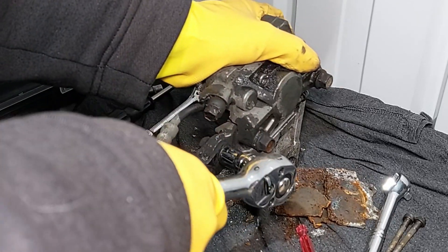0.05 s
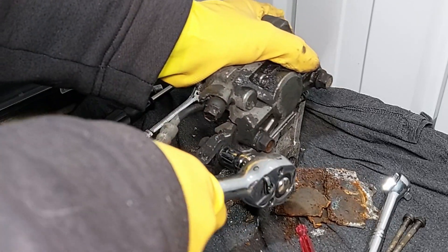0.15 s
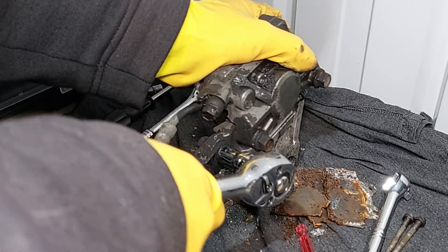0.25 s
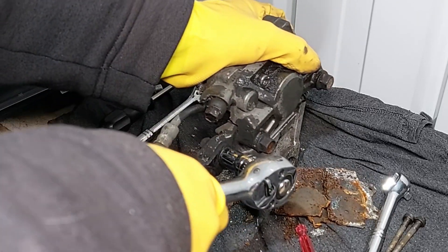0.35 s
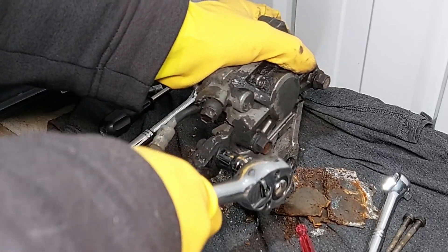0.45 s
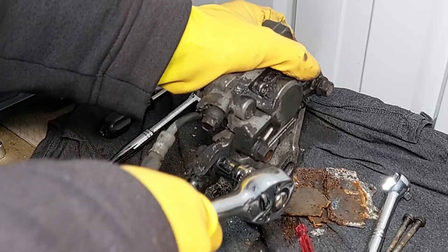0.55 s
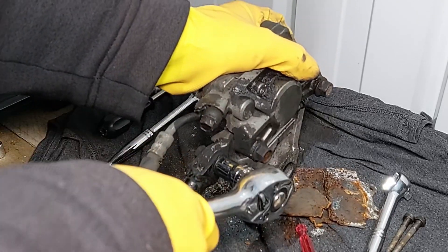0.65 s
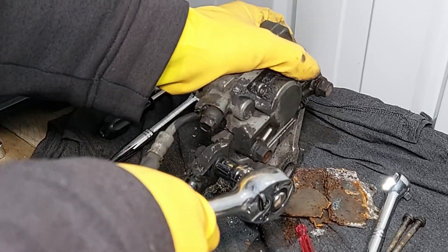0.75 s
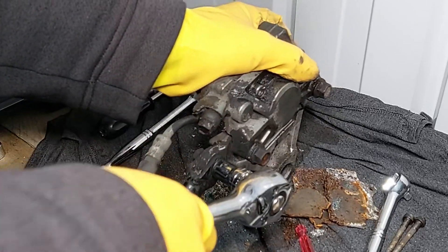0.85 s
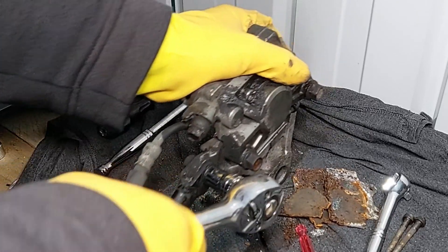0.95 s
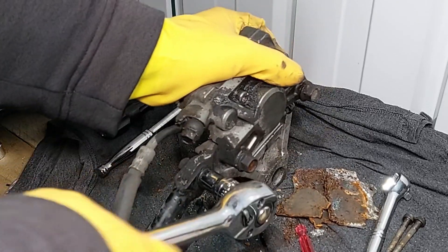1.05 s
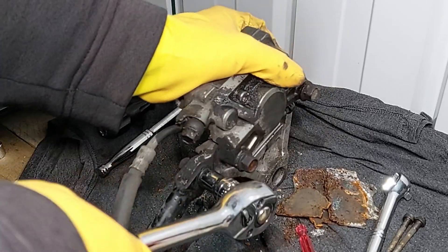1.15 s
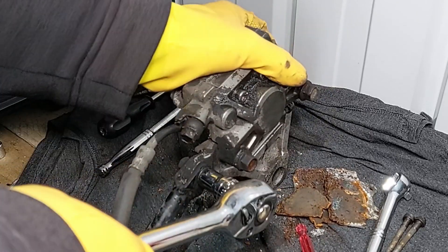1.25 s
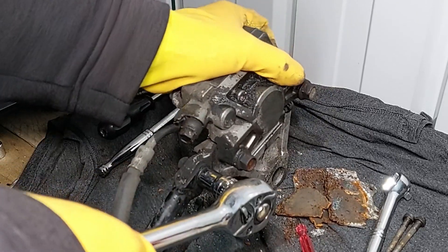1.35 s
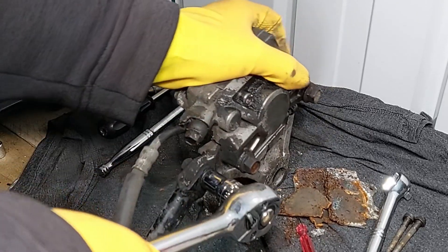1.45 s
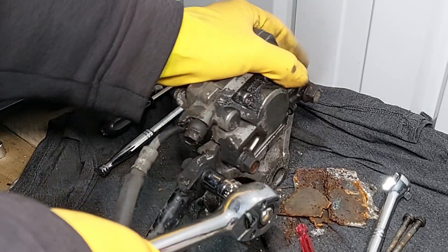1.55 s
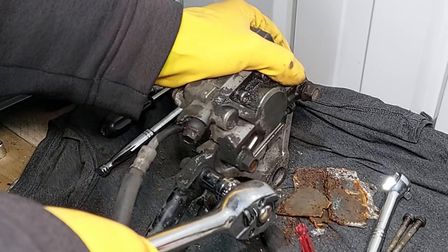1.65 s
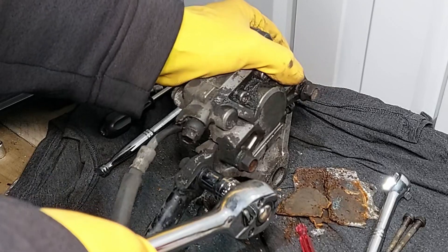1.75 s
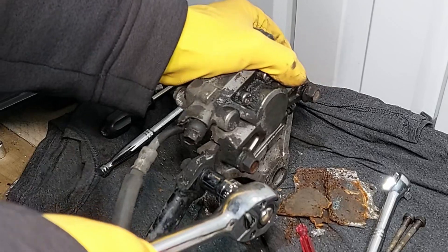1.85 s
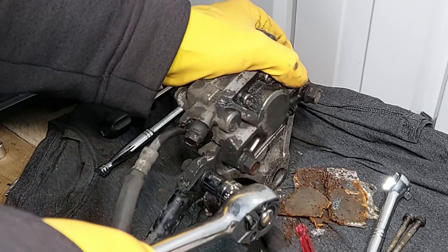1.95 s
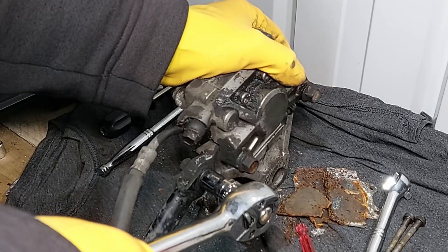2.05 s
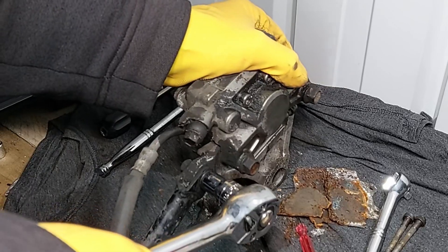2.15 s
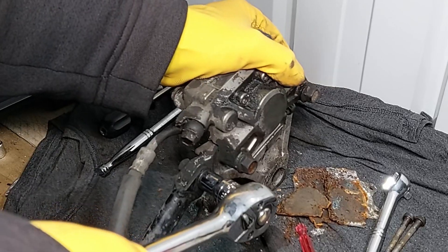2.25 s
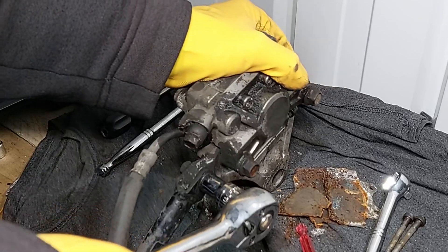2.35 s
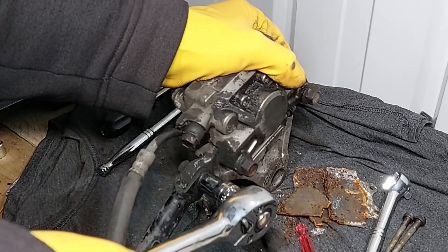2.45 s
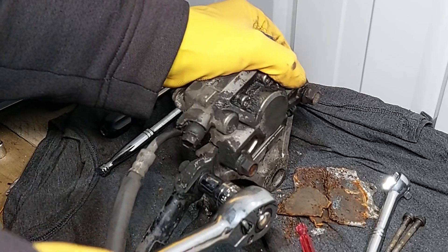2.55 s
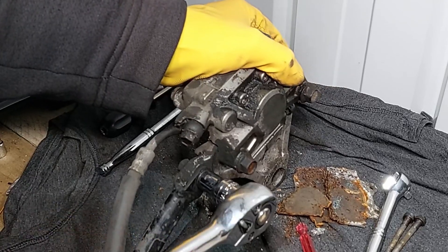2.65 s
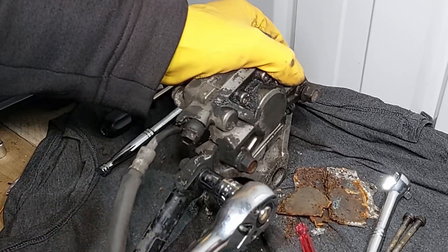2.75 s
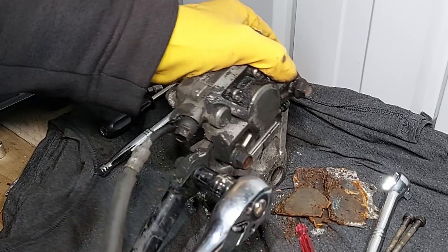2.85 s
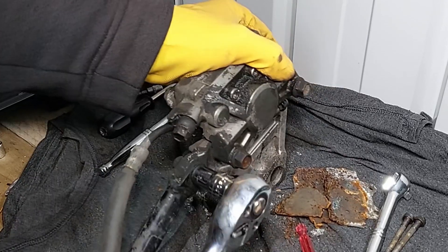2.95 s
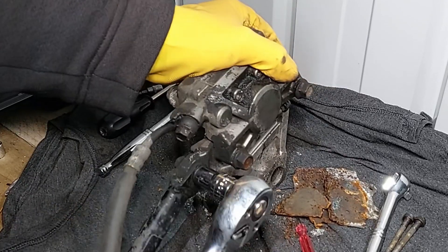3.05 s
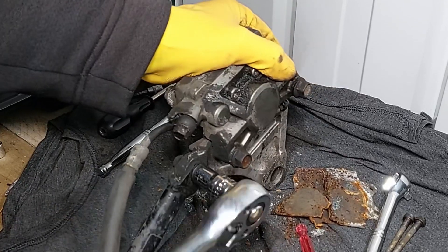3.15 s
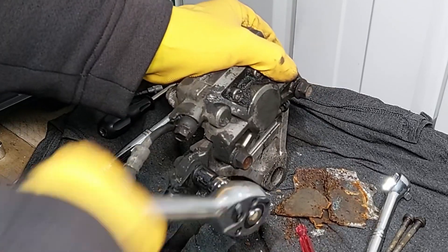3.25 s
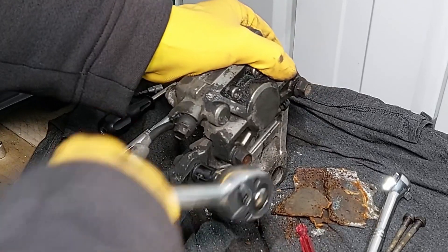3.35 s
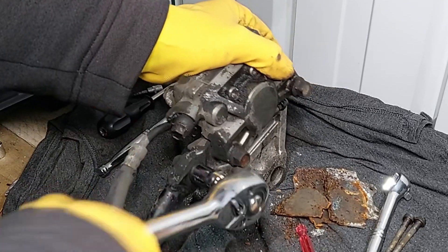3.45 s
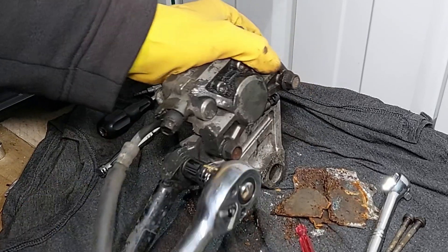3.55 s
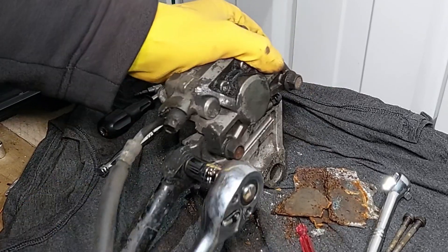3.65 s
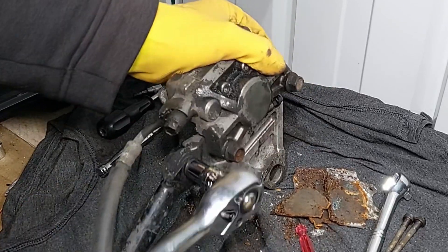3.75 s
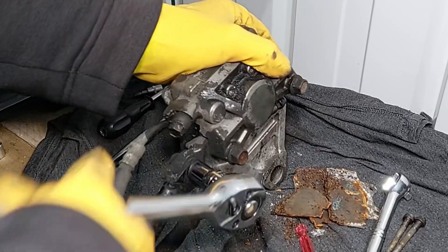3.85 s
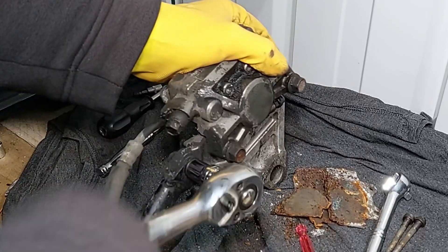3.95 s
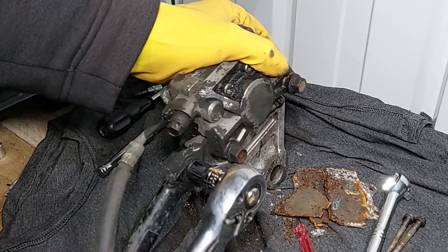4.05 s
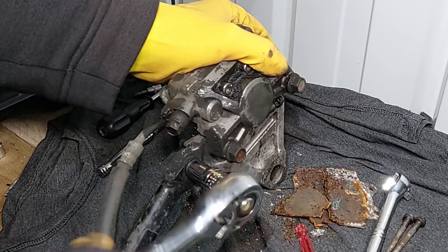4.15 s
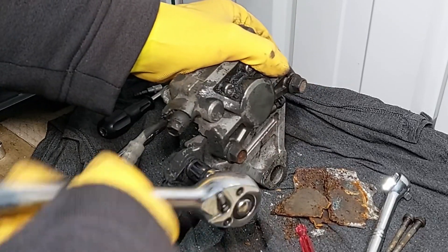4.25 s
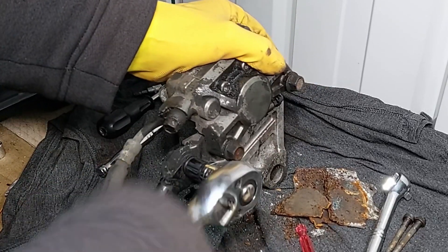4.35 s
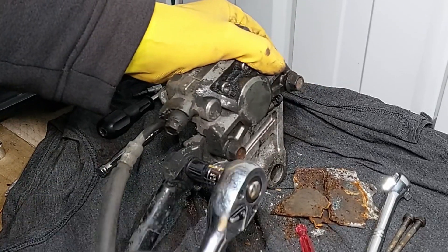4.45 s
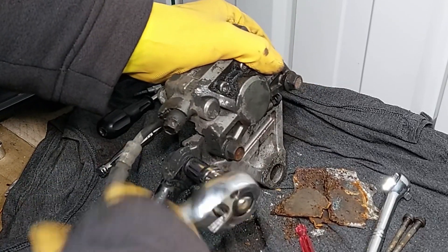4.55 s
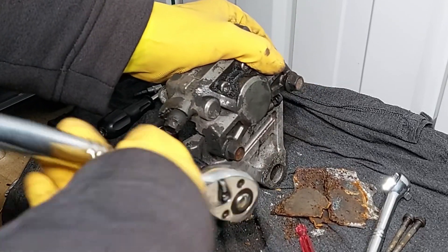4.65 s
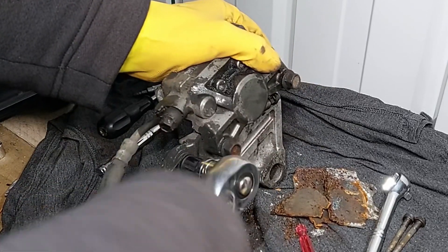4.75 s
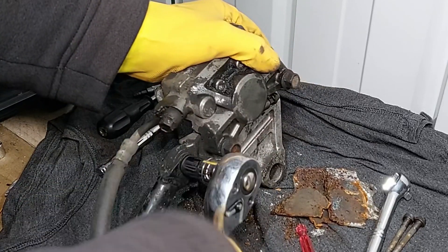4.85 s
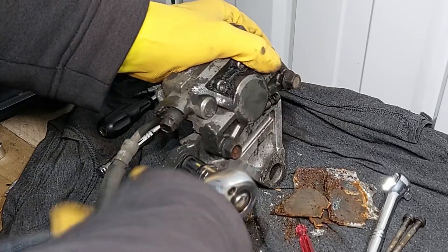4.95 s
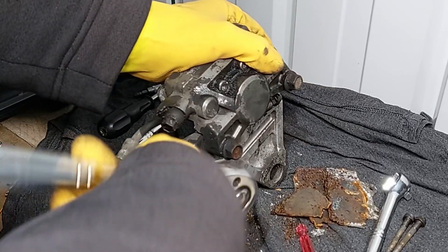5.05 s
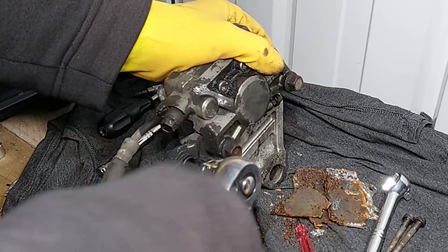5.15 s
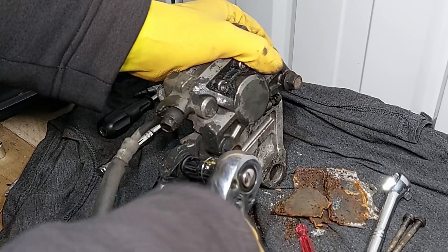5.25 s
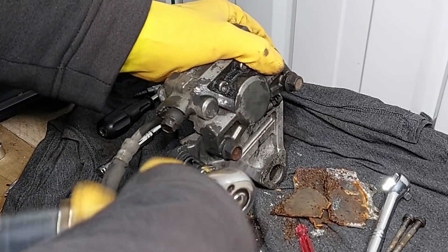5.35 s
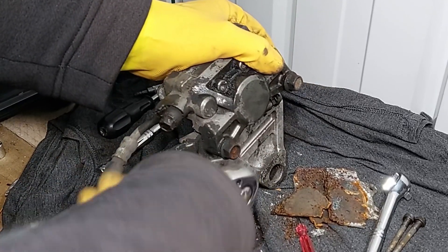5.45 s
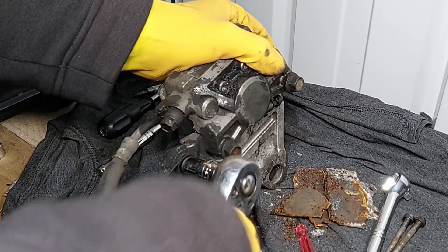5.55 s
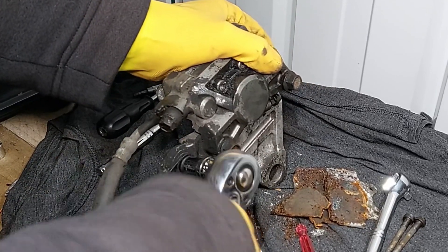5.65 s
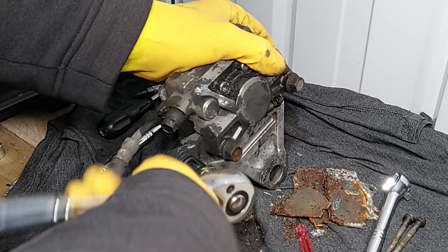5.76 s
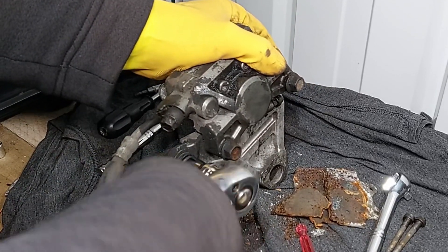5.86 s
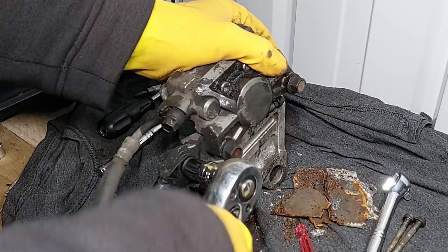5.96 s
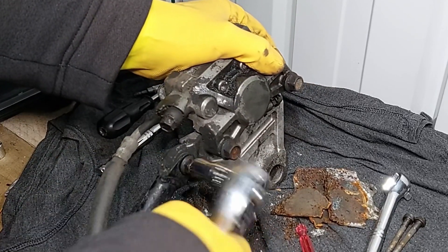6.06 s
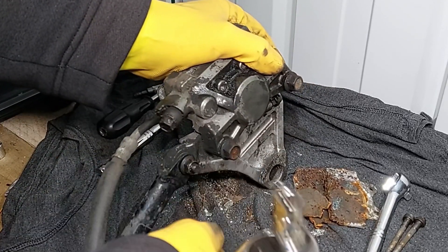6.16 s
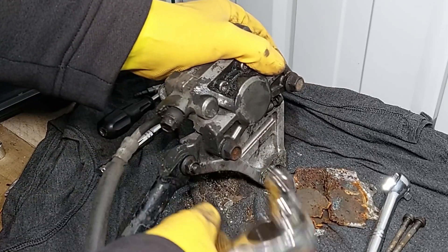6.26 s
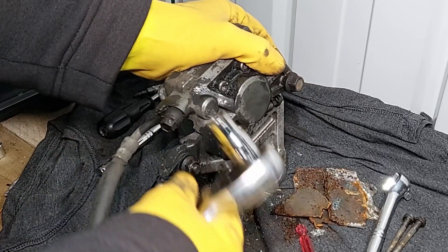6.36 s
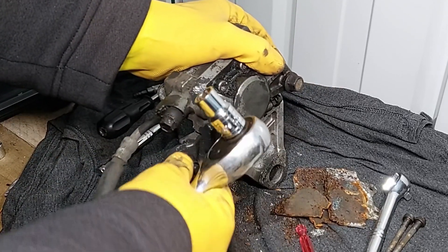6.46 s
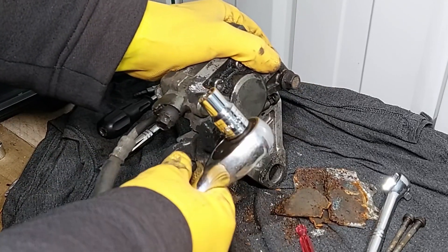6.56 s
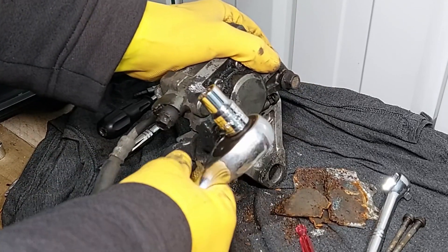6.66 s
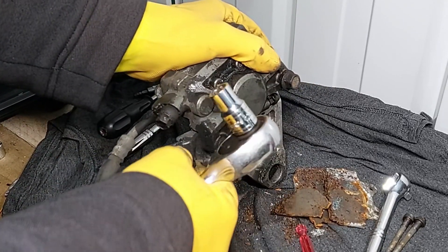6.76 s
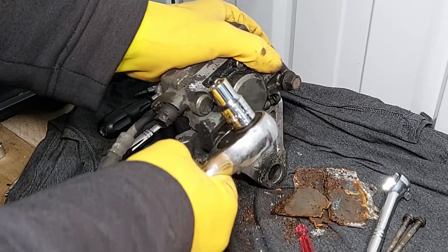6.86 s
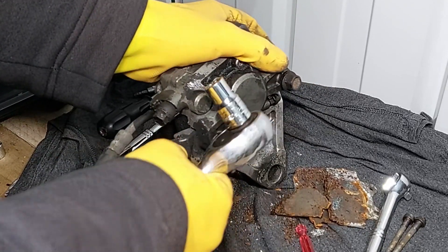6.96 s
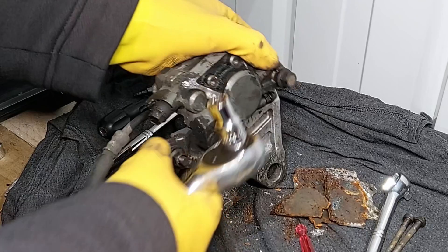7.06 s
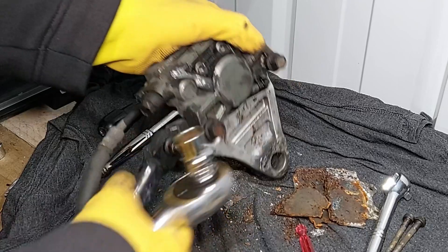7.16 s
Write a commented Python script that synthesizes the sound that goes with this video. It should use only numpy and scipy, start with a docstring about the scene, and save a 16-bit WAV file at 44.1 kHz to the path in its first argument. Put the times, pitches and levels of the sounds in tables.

```python
"""In a small shed, a hand ratchet is swung back seven times on a bolt; its sprung pawl snaps over the gear teeth
and bounces. Each blow is a burst of crack noise with decaying handle and head modes. The casting knocks on a
cloth-covered bench as sine thumps, small parts tap as humped noise bursts, gloves and sleeves rustle as grainy
noise, and the load rumbles, scrapes and squeaks faintly. Two close microphone ports hear it a little from one side."""
import sys
import numpy as np
from scipy import signal
from scipy.fft import rfft, irfft
from scipy.io import wavfile
from scipy.ndimage import uniform_filter1d

SR = 44100
rng = np.random.default_rng(int(sys.argv[2]) if len(sys.argv) > 2 else 0)


def wav_record(signal):
    """Record a signal, one row per channel, as 16-bit PCM in the file named by sys.argv[1]."""
    frames = np.transpose(np.atleast_2d(signal))
    bounded = np.clip(frames, -1, 1)
    # unit amplitude maps onto the largest positive 16-bit level
    quanta = np.round(bounded * 32767).astype(np.int16)
    wavfile.write(sys.argv[1], SR, quanta)


N = 317961  # samples

# Back swings of the handle. Each row: start in seconds, end in seconds, level of the first handle mode under
# each blow in dB, rumble level in dB, scrape level in dB, sleeve level in dB.
SWINGS = [(3.214, 3.40, -30.5, -49, -41.5, -53.5), (3.817, 3.97, -40.5, -48, -36, -45),
          (4.24, 4.36, -38.5, -37, -41, -47.5), (4.595, 4.74, -42, -38.5, -41.5, -48),
          (4.998, 5.13, -52, -42.5, -41, -50), (5.39, 5.49, -39.5, -52, -44.5, -46),
          (5.748, 5.87, -40, -44.5, -36, -45)]


def gain_of(db):
    """Decibels to amplitude."""
    return 10 ** (np.asarray(db) / 20)


def evened(x):
    """Scales to rms 1."""
    return x / np.sqrt(np.mean(x ** 2) + 1e-20)


def read(points, hz):
    """Reads a spectrum table along a log-frequency axis."""
    f, value = np.transpose(points)
    return np.interp(np.log(hz + 1), np.log(f + 1), value)


def add(mix, s, sound):
    """Mixes a sound in at time s, in seconds."""
    part = mix[round(s * SR):][:len(sound)]
    part += sound[:len(part)]


def coloured(x, spectrum):
    """Filters x by a dB spectrum."""
    hz = np.fft.rfftfreq(len(x), 1 / SR)
    return irfft(rfft(x) * gain_of(read(spectrum, hz)), len(x))


def ring(t, hz, db, t60, rise=0.00062):
    """A struck mode: a sine that swells within the rise time and loses 60 dB in t60 seconds."""
    decay = gain_of(db - 60 * t / np.maximum(t60, .005))
    return decay * (1 - np.exp(-t / rise)) * np.sin(2 * np.pi * hz * t)


def grainy(per_s, spread_db, smooth, grain_s):
    """Noise made of short slips of uneven size over a smooth bed."""
    slips = rng.random(N) < per_s / SR
    size = gain_of(spread_db * np.minimum(rng.exponential(1, N), 5)) * slips
    shape = np.exp(-np.arange(2000) / (grain_s * SR))
    grains = evened(signal.oaconvolve(size, shape)[:N])
    return rng.standard_normal(N) * (smooth + grains)


def swung(column, rise_db_per_s, fall_db_per_s):
    """An amplitude that climbs into each swing, holds its level and sinks after it."""
    t = np.arange(N) / SR
    total = np.zeros(N)
    for row in SWINGS:
        climb_db = rise_db_per_s * np.maximum(row[0] - t, 0)
        sink_db = fall_db_per_s * np.maximum(t - row[1], 0)
        total += gain_of(row[column] - climb_db - sink_db)
    return total


def air():
    """The steady air of the shed: noise, heaviest in the bass."""
    # Colour of the air. Each row: frequency in Hz, relative density in dB per Hz.
    air_spectrum = [(12, -37), (20, 9), (65, 9.5), (205, -20.5), (295, -3.5), (414, -14.5), (450, -21.5),
                    (518, -22), (1780, -28.5), (2350, -37.5), (10400, -31.5), (14200, -37), (16300, -54)]
    level_db = -48
    return gain_of(level_db) * evened(coloured(rng.standard_normal(N), air_spectrum))


def shed(x):
    """Dense reflections, each band dying at its own speed."""
    # Decay of the room. Each row: frequency in Hz, t60 in seconds.
    decay_times = [(200, 0.18), (1000, 0.24), (4000, 0.17), (9000, 0.12), (15000, 0.17)]
    hz, t, z = signal.stft(rng.standard_normal(SR // 2), SR, nperseg=256)
    fade = gain_of(-60 * t / read(decay_times, hz)[:, None])
    tail = signal.istft(z * fade, SR, nperseg=256)[1]
    tail *= np.minimum(np.arange(len(tail)) / (0.0062 * SR), 1)  # the reflections build up over 6.2 ms
    return signal.fftconvolve(x, tail / np.linalg.norm(tail))[:N]


def bench_load():
    """The casting rocks and drags: lumpy rumble and a low scrape."""
    # Weight shifting on the bench apart from the swings. Each row: time in seconds, rumble level in dB,
    # scrape level in dB.
    load_levels = [(0, -54, -48.5), (.3, -49, -53.5), (.61, -63, -44), (.8, -56, -48.5), (.95, -44, -43.5),
                   (1.14, -50.5, -46.5), (1.45, -45, -52.5), (1.84, -53, -51.5), (2.05, -50, -54.5),
                   (2.4, -49, -50), (2.77, -47.5, -59), (3.0, -50, -42.5), (3.13, -60, -36),
                   (3.38, -47, -39), (3.47, -23.5, -47), (3.58, -39, -40.5), (3.68, -33.5, -29),
                   (4.05, -38.5, -49), (4.18, -46, -59), (4.901, -44, -55.5), (6.051, -43.5, -61),
                   (6.158, -45.5, -31.5), (6.27, -51, -55), (6.45, -58.5, -53.5), (6.7, -48, -43),
                   (6.88, -54.5, -58), (7.08, -47, -52.5), (7.21, -60, -50)]
    # Colour of the rocking. Each row: frequency in Hz, relative density in dB per Hz.
    rumble_spectrum = [(12, -37.5), (20, -6), (86, 1.5), (162, -1), (193, -6), (260, -3.5), (340, -28),
                       (570, -120)]
    # Colour of the dragging. Each row: frequency in Hz, relative density in dB per Hz.
    scrape_spectrum = [(82, -36), (140, -4.5), (275, 0), (344, -0.5), (431, 5), (506, -1), (681, -5.5),
                       (779, -11.5), (1020, -9), (1200, -10), (1560, -56.5), (2640, -120)]
    s, rumble_db, scrape_db = np.transpose(load_levels)
    t = np.arange(N) / SR
    push = swung(column=3, rise_db_per_s=110.5, fall_db_per_s=75)
    drag = swung(column=4, rise_db_per_s=110.5, fall_db_per_s=75)
    rumble = evened(coloured(grainy(40, spread_db=2.5, smooth=1.1, grain_s=.02), rumble_spectrum))
    scrape = evened(coloured(grainy(120, spread_db=3., smooth=.7, grain_s=.007), scrape_spectrum))
    rumble_gain = gain_of(np.interp(t, s, rumble_db)) + push
    scrape_gain = gain_of(np.interp(t, s, scrape_db)) + drag
    return rumble_gain * rumble + scrape_gain * scrape


def rustle():
    """Fine fibre slips; the treble has its own level; the sleeve drags through each swing and settles."""
    # Cloth and gloves rubbing. Each row: time in seconds, body level in dB, treble level in dB.
    rub_levels = [(0, -60.5, -65.5), (.48, -60.5, -67), (.55, -53, -61), (.75, -60, -61.5),
                  (.95, -47, -54.5), (1.14, -54.5, -62), (1.35, -47, -59.5), (1.75, -51, -69),
                  (1.9, -57.5, -66), (2.55, -61.5, -68), (2.68, -49.5, -66), (2.73, -41, -59),
                  (2.85, -43, -58), (2.97, -45, -56), (3.15, -45, -57.5), (3.58, -45, -55.5),
                  (3.72, -37.5, -51.5), (4.15, -77.5, -63.5), (5.1, -58, -68), (6.1, -58, -67),
                  (6.16, -46, -56.5), (6.34, -59.5, -68), (6.52, -62.5, -63), (6.57, -47, -69),
                  (6.85, -64.5, -66), (6.9, -54, -64.5), (7.21, -56.5, -66)]
    # Colour of the cloth. Each row: frequency in Hz, relative density in dB per Hz.
    cloth_spectrum = [(180, -38), (300, -1), (331, -2), (398, -4), (462, -4.5), (537, -4.5), (946, -10),
                      (2070, -7.5), (6520, -13.5), (16000, -24)]
    sleeve_treble_db = -7  # against the sleeve's body
    s, body_db, treble_db = np.transpose(rub_levels)
    t = np.arange(N) / SR
    sleeve = swung(column=5, rise_db_per_s=210, fall_db_per_s=81)
    cloth = coloured(grainy(900, spread_db=3.5, smooth=1.1, grain_s=.003), cloth_spectrum)
    body = signal.sosfiltfilt(signal.butter(1, 4000, fs=SR, output="sos"), cloth)
    fizz = cloth - body
    body_gain = gain_of(np.interp(t, s, body_db)) + sleeve
    fizz_gain = gain_of(np.interp(t, s, treble_db)) + gain_of(sleeve_treble_db) * sleeve
    return body_gain * evened(body) + fizz_gain * evened(fizz)


def squeaks():
    """Narrow wavering tones: noise in one sharp resonance."""
    # Faint thin squeaks under load. Each row: start in seconds, end in seconds, pitch in Hz, width in Hz, level in dB.
    squeak_list = [(.87, .98, 4150, 90, -60), (1.37, 1.68, 4420, 70, -65), (1.62, 1.81, 1440, 50, -58),
                   (3.05, 3.11, 6500, 200, -55), (7.1, 7.2, 4200, 90, -66)]
    out = np.zeros(N)
    for start, end, hz, width, db in squeak_list:
        length = round((end - start) * SR)
        tone = signal.lfilter(*signal.iirpeak(hz, hz / width, SR), rng.standard_normal(length))
        add(out, start, gain_of(db) * evened(tone) * signal.windows.tukey(length, .3))
    return out


def taps():
    """Short bursts of noise with a hump around a centre: a sharp tick with a brief ring, then a tail."""
    # Small taps of tool and parts. Each row: start in seconds, level in dB, centre in Hz, t60 in seconds.
    tap_list = [(0.073, -39, 1100, 0.13), (.258, -42, 1100, 0.16), (.392, -28.5, 3260, 0.016),
                (.41, -35.5, 1100, 0.093), (0.601, -34, 1510, 0.093), (.638, -26.5, 1640, 0.069),
                (0.799, -30.5, 1080, .11), (0.876, -38, 1510, 0.074), (.933, -34, 2400, .023),
                (.989, -35, 1930, 0.084), (1.077, -34.5, 1640, 0.12), (1.105, -35, 2080, .022),
                (1.171, -33, 1820, 0.032), (1.275, -38, 2180, 0.077), (1.342, -32, 1620, 0.053),
                (1.363, -34, 2790, 0.046), (1.503, -36, 1690, .085), (1.785, -39, 1140, 0.028),
                (2.948, -27, 1160, 0.028), (3.03, -30.5, 1750, .073), (3.166, -30, 1630, .078),
                (3.467, -28, 1460, .1), (3.492, -31, 1580, 0.029), (3.559, -21.5, 1390, 0.035),
                (3.625, -33, 1600, 0.1), (3.655, -26, 1870, .11), (3.713, -18.5, 2000, 0.046),
                (3.746, -25, 2100, 0.14), (4.014, -11.5, 2570, 0.0086), (4.098, -32, 2360, 0.058),
                (4.172, -31, 2450, .079), (4.394, -23.5, 2900, 0.039), (4.414, -21, 2110, 0.024),
                (4.796, -34, 2850, 0.1), (4.904, -42, 1530, 0.12), (5.287, -34, 2240, 0.071),
                (5.528, -29, 3100, 0.098), (5.668, -34, 2170, .13), (5.71, -27.5, 2900, .06),
                (5.918, -26, 2880, 0.056), (6.086, -40, 2830, 0.16), (6.135, -16, 2720, 0.027),
                (6.199, -22.5, 3460, 0.028), (6.218, -35, 5450, 0.036), (6.341, -38.5, 4180, 0.054),
                (6.415, -39, 1890, .1), (6.551, -35, 1830, .26), (6.719, -44, 5120, 0.051),
                (6.738, -39, 1940, 0.15), (7.033, -48, 1940, .025), (7.085, -41.5, 2260, 0.091)]
    # A glove slides on chrome. One row: start in seconds, level in dB, centre in Hz, width in octaves, t60 in seconds.
    glove_slide = (3.035, -37, 12500, .25, .4)
    # Modes of the socket. Each row: frequency in Hz, relative level in dB, t60 in seconds.
    socket_modes = [(2570, -12, .1), (2800, -2, .04), (3250, -9, .045), (4370, -3, .12), (5416, -5, .08),
                    (8300, -8, .04)]
    socket_s, socket_db = 6.137, -29  # the socket comes off the bolt
    tap_octaves = 0.68  # width of the hump
    out, t = np.zeros(N), np.arange(8000) / SR
    f = np.fft.rfftfreq(8000, 1 / SR) + 1
    rows = [glove_slide] + [(s, db, hz, tap_octaves, t60) for s, db, hz, t60 in tap_list]
    for s, db, hz, octaves, t60 in rows:
        away = np.log2(f / hz) / max(octaves, .1)
        hump = gain_of(-14. * np.log2(1 + 0.167 * away ** 2) - 2.54 * np.log2(f / hz))
        tail = gain_of(-6.5 - 60 * t / max(t60, .005))
        tick = gain_of(-18.5 - 60 * t / 0.015)
        noise = evened(irfft(rfft(rng.standard_normal(len(t))) * hump, len(t)))
        burst = noise * (1 - np.exp(-t / 0.00038)) * (tail + tick)
        add(out, s, gain_of(db) * (burst + ring(t, hz, -14.5, 0.028)))
    add(out, socket_s, sum(ring(t, hz, socket_db + db, t60) for hz, db, t60 in socket_modes))
    return out


def knocks():
    """A soft push at its own pitch; the bench top thumps and its boards ring with it."""
    # Dull knocks on the bench. Each row: start in seconds, relative level in dB, pitch in Hz.
    knock_list = [(0.079, -38, 470), (0.198, -34.5, 285), (0.238, -34.5, 296), (0.431, -28, 262),
                  (0.598, -26.5, 205), (0.635, -21.5, 314), (0.77, -29, 289), (0.798, -27.5, 274),
                  (0.929, -32, 269), (1.046, -21.5, 460), (1.093, -23, 97), (1.262, -25.5, 276),
                  (1.347, -32.5, 460), (1.579, -27.5, 288), (1.8, -39, 272), (1.925, -34.5, 280),
                  (2.537, -31, 141), (2.747, -34.5, 268), (2.947, -22, 280), (3.072, -28, 433),
                  (3.125, -17.5, 283), (3.176, -17.5, 96.9), (3.405, -23, 261), (3.453, -12.5, 129),
                  (3.474, -12.5, 280), (3.555, -16, 327), (3.649, -18.5, 394), (3.684, -13, 252),
                  (3.706, -11.5, 287), (3.773, -16, 265), (3.86, -32, 458), (4.004, -32, 236),
                  (4.038, -21, 396), (4.212, -32, 88), (4.388, -17, 226), (4.407, -22, 110),
                  (4.644, -21, 98), (4.748, -13, 242), (4.87, -29.5, 277), (5.037, -18.5, 304),
                  (5.141, -23.5, 400), (5.282, -36, 592), (5.355, -26.5, 413), (5.424, -24, 285),
                  (5.523, -25, 250), (5.61, -23, 278), (5.778, -32, 430), (5.823, -13, 242),
                  (5.895, -17, 229), (6.011, -32, 283), (6.134, -16.5, 409), (6.195, -27, 400),
                  (6.499, -36.5, 270), (6.546, -32, 173), (6.597, -37, 112.6), (6.677, -35.5, 87),
                  (6.758, -35.5, 592)]
    # Modes of the boards. Each row: frequency in Hz, typical level in dB, t60 in seconds.
    board_modes = [(262, -8, 0.065), (400.7, -18, 0.25), (590, -18.5, 0.069), (1026, -28, 0.033)]
    thump_hz, thump_t60 = 106.8, 0.077  # the whole bench top flexes; t60 in seconds
    base_t60, base_thump_db = 0.082, -11  # seconds and dB, for a knock of -25 dB
    shorter, thump_growth = 0.16, 0.26  # dB of t60 lost and of thump won for each dB of strength
    out, t = np.zeros(N), np.arange(7000) / SR
    for s, db, hz in knock_list:
        strength_db = db + 25
        push = ring(t, hz, 0, base_t60 * gain_of(-shorter * strength_db), 0.0032)
        thump = ring(t, thump_hz, base_thump_db + thump_growth * strength_db, thump_t60, 0.0025)
        luck = rng.standard_normal(len(board_modes))  # each knock excites the boards differently
        boards = sum(ring(t, f, g + 5.9 * e, t60, 0.0035) for (f, g, t60), e in zip(board_modes, luck))
        add(out, s, gain_of(db - 1.0) * (push + thump + boards))
    return out


def ratchet():
    """Each blow is a scratchy crack of steel that rings the handle and the head; loose parts break up the rings."""
    # Pawl blows, landings and bounces. Each row: start in seconds, level in dB, then the second, third and
    # fourth handle modes in dB against that level.
    pawl_blows = [(3.2146, -2.5, -14.5, -7.5, -15), (3.2212, -8, -25, -24, -16),
                  (3.2456, -3.5, -21, -7.5, -8.5), (3.2514, -2.5, -15, -12, -20),
                  (3.275, -8.5, -6, -8, -26), (3.2803, -4.5, -12, -5, -12), (3.3007, -6.5, -12, -24, -25),
                  (3.3049, -8, -20, -15, -27), (3.3099, -16, -11, 0.5, -26), (3.3271, -10.5, -6, -7, -6.5),
                  (3.3345, -10, 2.5, -4, -16), (3.3711, -8, -17, -9, -24), (3.7964, -4, -22, -11.5, -19),
                  (3.8084, -7, -24, -15, -23), (3.8142, -20, -28, 7, -3), (3.8309, -12, -6, -7, -13),
                  (3.836, -5.5, -6.5, -14, -8.5), (3.856, -10, -10, -20, -15),
                  (3.8605, -5.5, -19, -13, -18), (3.8847, -3.5, -14, -16, -30),
                  (3.8973, -8.5, -6, -21, -10), (3.9213, -10.5, -5, -5.5, -9.5), (3.9434, -5, -21, -8, -15),
                  (4.2346, -13, -12, -4.5, -3), (4.2411, -7, -8.5, 0, -1), (4.2624, -7.5, -16, -4, -20),
                  (4.2678, -7, -13, -5.5, -17), (4.2874, -11.5, -4.5, -6.5, -7.5),
                  (4.2954, -7.5, -8, -19, -7), (4.3163, -13, 2, -9, -9), (4.3236, -7, -25, -8.5, -16),
                  (4.595, -7.5, -27, -20, -7.5), (4.5977, -8, -28, -18, -16), (4.609, -13.5, -4, -11, -8),
                  (4.614, -9, -30, -8, -5), (4.6281, -6, -22, -12, -25), (4.633, -9.5, -8, -3, -6),
                  (4.6514, -8.5, -12.5, -22, -12), (4.6547, -9, -8, -4.5, -23), (4.6723, -20, -25, 5, -28),
                  (4.6754, -7, -6.5, -6, -26), (4.6895, -6.5, -27, -9, -28), (4.7074, -8, -14, -6.5, -10),
                  (4.9785, -3.5, -13, -27, -13.5), (4.9827, -24, -6, -24, -6), (4.9994, -7, -14, -20, -15),
                  (5.0035, -10.5, -4, -22, -7), (5.018, -2.5, -6, -6, -15), (5.0272, -12.5, -4, -12, -5),
                  (5.0342, -6.5, -4, -27, -7), (5.0598, -4.5, -14, -28, -10), (5.0639, -10, -36, -2.5, -6),
                  (5.0897, -5, -17, -26, -28), (5.0997, -7, -28, -10, -28), (5.1035, -23.5, -25, 0.5, -27),
                  (5.3537, -5, -17.5, -12.5, -17), (5.3574, -12, -33, -12, -22),
                  (5.3774, -7.5, -12, -23, -21), (5.3814, -9.5, -22, -16, -25), (5.3961, -6, -23, -11, -4),
                  (5.4064, -10, -10, -12, -5), (5.4152, -5.5, -8, -16, -19), (5.42, -15.5, -4, -3, -17),
                  (5.4324, -3, -20, -17, -6), (5.4375, -12, -16, -14, -12), (5.457, -8.5, -25, -7, -6),
                  (5.4614, -7, -8.5, -32, -28), (5.7341, -6.5, -11.5, -8.5, -19.5),
                  (5.7367, -8, -17.5, -13, -23), (5.757, -5, -22, -20, -13), (5.7604, -6.5, -14, -15, -11),
                  (5.778, -5, -25.5, -10, -10), (5.7823, -11.5, -25.5, -19, -8.5),
                  (5.7924, -9, -17, -5, -8), (5.7978, -7.5, -23.5, -4, -3.5), (5.8045, -11.5, -11, -6, -1),
                  (5.8154, -6.5, -17, -25, -16), (5.8202, -12, -18, -23, -26.5),
                  (5.8419, -4, -16.5, -15.5, -23.5)]
    # Bending modes of the handle. Each row: central frequency in Hz, gain in dB, ring as a share of the
    # blow's t60, level of a faint longer ring in dB against the mode.
    handle_modes = [(1630, 4, 1.8, -20), (3200, 1, .7, -30), (6310, 3, 1.05, -19), (10090, 3, .65, -27)]
    # Minor modes of the head. Each row: central frequency in Hz, typical level in dB, ring as a share of the blow's t60.
    head_modes = [(2843, -22.5, 0.67), (3410, -24, 0.28), (4290, -36.5, 0.24), (4243, -25.5, 0.9),
                  (4695, -24, 0.24), (5920, -15.5, 0.29), (6550, -23.5, 0.19), (8540, -17.5, 0.17),
                  (9450, -22, 0.52), (12230, -19.5, 0.35), (14100, -23, 0.32)]
    # Colour of the crack. Each row: frequency in Hz, relative density in dB per Hz.
    crack_spectrum = [(290, -46), (500, -24), (773, -26), (2190, -15.5), (3200, -11.5), (3440, -10),
                      (5240, -10.5), (6330, -12), (7420, -12.5), (10400, -13.5), (16000, -24)]
    blow_t60 = 0.052  # seconds
    out, t = np.zeros(N), np.arange(7000) / SR
    head_t = t[:2500]
    hiss = evened(coloured(rng.standard_normal(N + len(t)), crack_spectrum))
    crack_shape = gain_of(-10.5 - 60 * t / (0.75 * blow_t60)) * (1 - np.exp(-t / 0.0023))
    gaps = np.diff([row[0] for row in pawl_blows], append=N / SR)
    for (s, db, *upper_db), gap in zip(pawl_blows, gaps):
        first_db = [row[2] for row in SWINGS if row[0] <= s][-1]
        crack = crack_shape * hiss[round(s * SR):][:len(t)]
        held = gain_of(-9. * np.clip((t - gap) / 0.0074, 0, 1))  # the next contact of the pawl damps the ring
        handle = np.zeros(len(t))
        for (hz, gain_db, share, long_db), bend_db in zip(handle_modes, [first_db, *upper_db]):
            detune, long_detune = rng.standard_normal(2)
            mode_db = gain_db + bend_db
            handle += ring(t, hz * (1 + 0.005 * detune), mode_db, share * blow_t60) * held
            handle += ring(t, hz * (1 + 0.00284 * long_detune), mode_db + long_db, 0.25)
        head = np.zeros(len(head_t))
        for hz, mode_db, share in head_modes:
            detune, luck = rng.standard_normal(2)
            head += ring(head_t, hz * (1 + 0.005 * detune), mode_db + 5.6 * luck, share * blow_t60)
        slow, quick = rng.standard_normal((2, len(t)))  # play of the loose parts
        wobble = 1 + .28 * evened(uniform_filter1d(uniform_filter1d(slow, 110), 110))
        chatter = 1 + 1.0 * evened(uniform_filter1d(uniform_filter1d(quick, 40), 40))
        add(out, s, gain_of(db) * (crack + handle * wobble))
        add(out, s, gain_of(db) * head * chatter[:len(head)])
    return out


def two_ports(mix):
    """Sound reaches the left port first; diffuse treble is added to one port and subtracted from the other."""
    # Lead of the left port. Each row: frequency in Hz, phase lead in radians.
    left_lead = [(100, .014), (500, .07), (1200, .16), (2500, .32), (4000, .52), (6300, .8), (10000, 1.25),
                 (12500, 1.5), (16000, 2.2)]
    # Sound that the ports do not share. Each row: frequency in Hz, level in dB against the mix.
    unshared_spectrum = [(1500, -36), (3000, -21), (6000, -14), (10000, -10), (13000, -4), (16000, -2)]
    turn = np.exp(.5j * read(left_lead, np.fft.rfftfreq(N, 1 / SR)))  # half the lead for each port
    z = signal.stft(mix, nperseg=128)[2]
    random_phase = np.exp(2j * np.pi * rng.random(z.shape))
    scattered = signal.istft(z * random_phase, nperseg=128)[1][:N]
    unshared = coloured(scattered, unshared_spectrum)
    left = irfft(rfft(mix) * turn, N) + unshared
    right = irfft(rfft(mix) / turn, N) - unshared
    return np.array([left, right])


def scene():
    """The ratchet, knocks and taps echo in the shed; air, cloth, load and squeaks stay dry."""
    hits = taps() + knocks() + ratchet()
    mix = air() + bench_load() + rustle() + squeaks() + hits + gain_of(-9.0) * shed(hits)
    return two_ports(mix)


def record(dry):
    """The bass is narrowed towards mono, the lowest rumble cut, the loudest peaks rounded; then the band limit."""
    # Narrowing of the stereo image. Each row: frequency in Hz, gain on the left-right difference in dB.
    side_gain = [(40, -17), (85, -22), (180, -33), (350, -11), (700, -4), (1400, -13), (2500, -2),
                 (4000, 0)]
    low_cut_hz, edge_hz = 42, 16150
    ceiling = 1.25  # amplitude at which the input stage saturates
    mid = (dry[0] + dry[1]) / 2
    side = coloured((dry[0] - dry[1]) / 2, side_gain)
    low_cut = signal.butter(2, low_cut_hz, "high", fs=SR, output="sos")
    both = signal.sosfilt(low_cut, [mid + side, mid - side])
    both = ceiling * np.tanh(both / ceiling)
    band_limit = signal.firwin(255, edge_hz, window=("kaiser", 9), fs=SR)
    return signal.oaconvolve(both, band_limit[None], "same")


dry = scene()
out = record(dry)
wav_record(out)
```